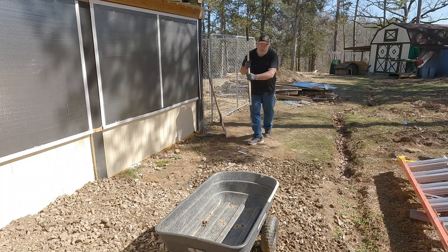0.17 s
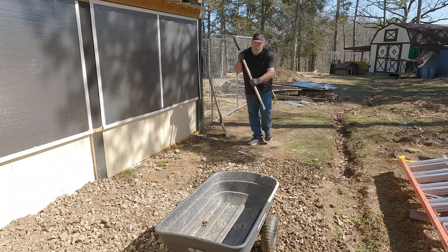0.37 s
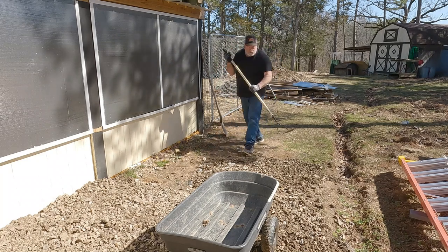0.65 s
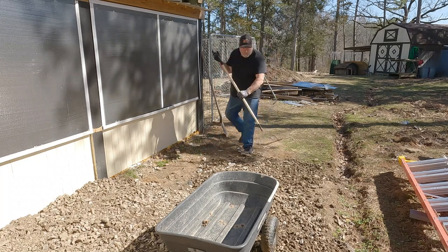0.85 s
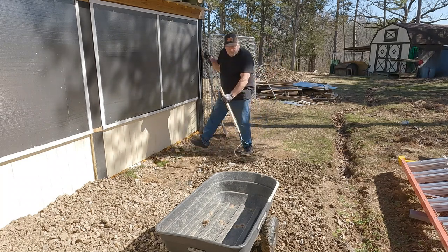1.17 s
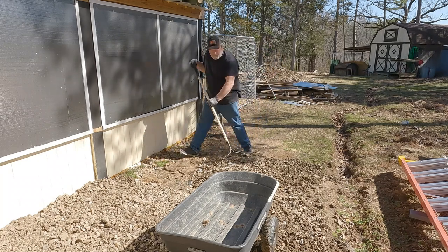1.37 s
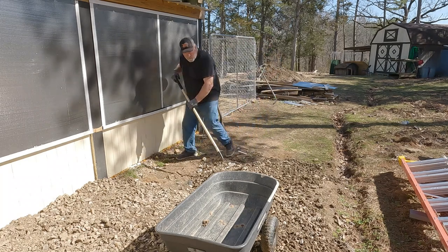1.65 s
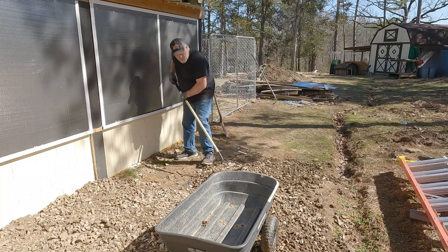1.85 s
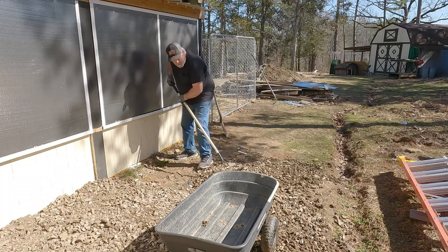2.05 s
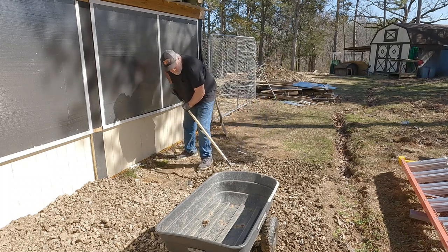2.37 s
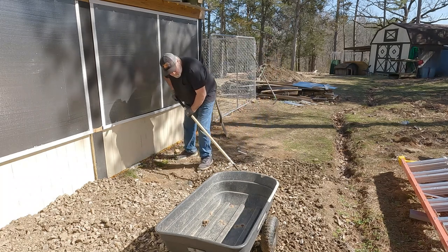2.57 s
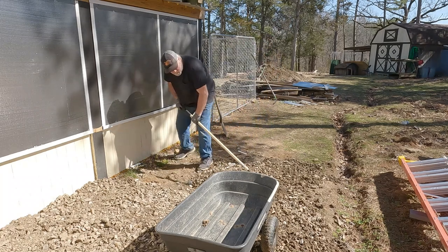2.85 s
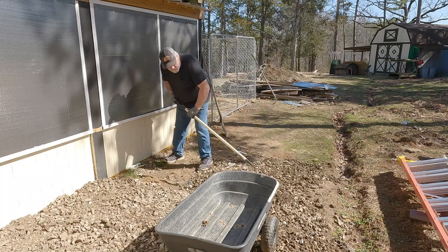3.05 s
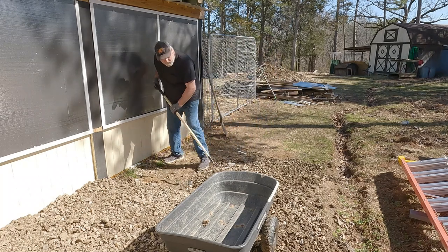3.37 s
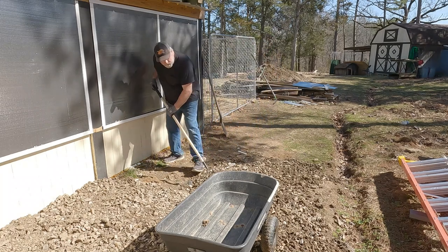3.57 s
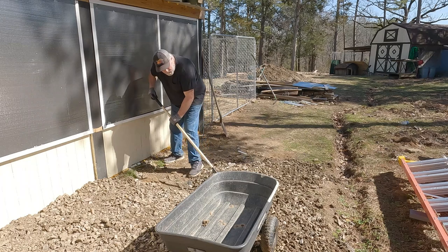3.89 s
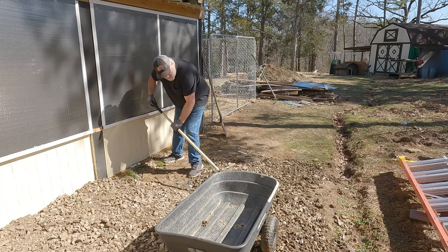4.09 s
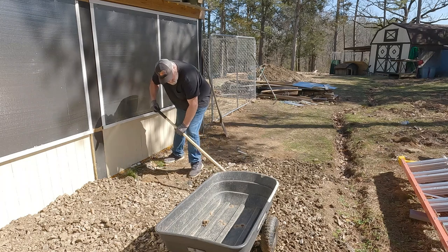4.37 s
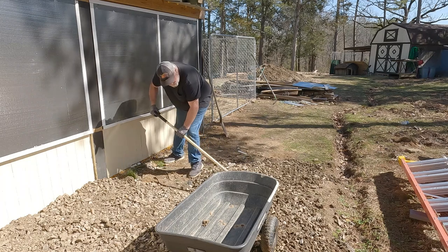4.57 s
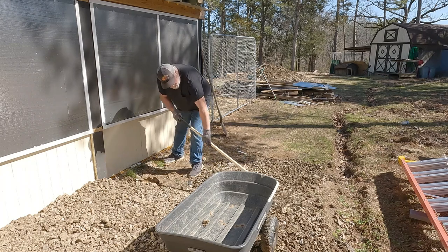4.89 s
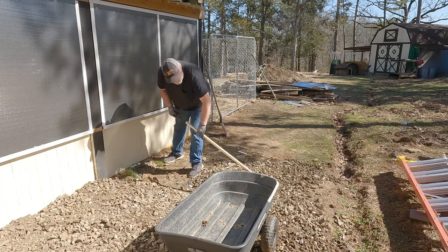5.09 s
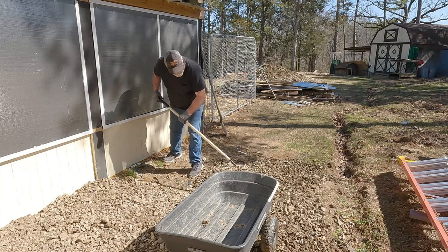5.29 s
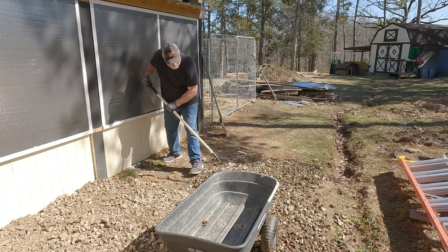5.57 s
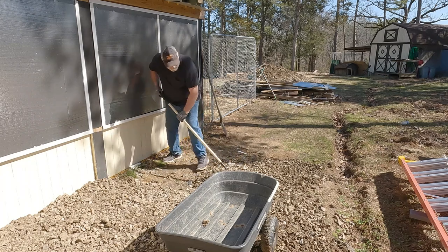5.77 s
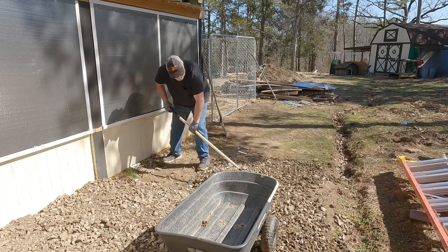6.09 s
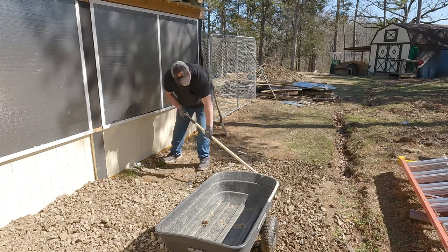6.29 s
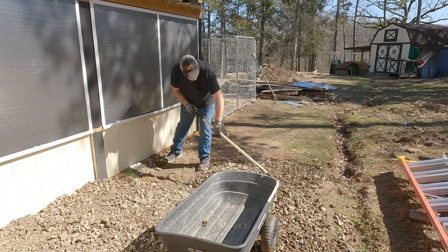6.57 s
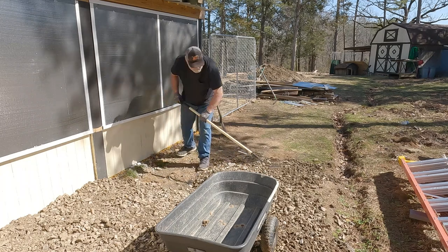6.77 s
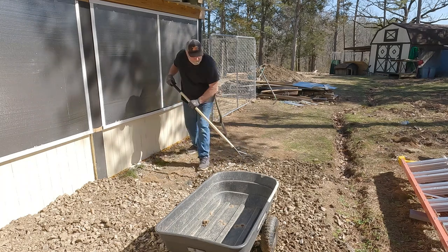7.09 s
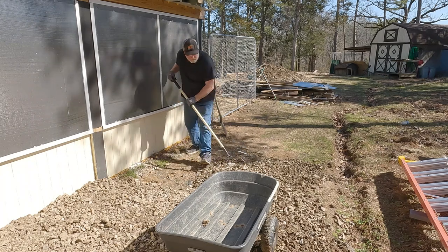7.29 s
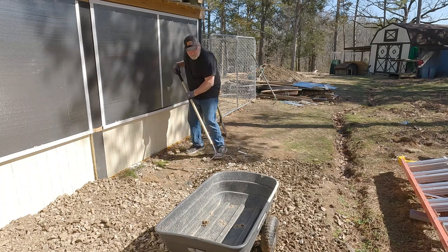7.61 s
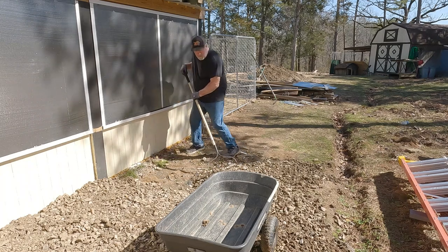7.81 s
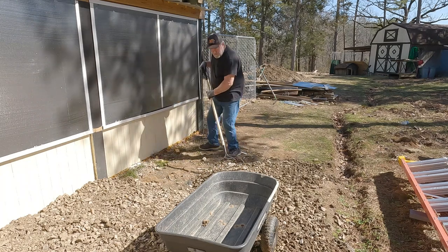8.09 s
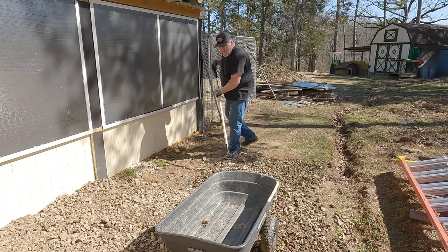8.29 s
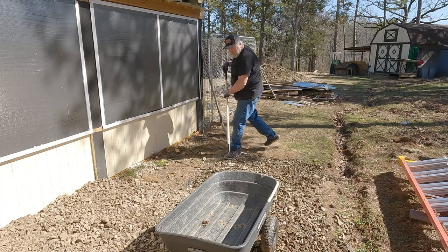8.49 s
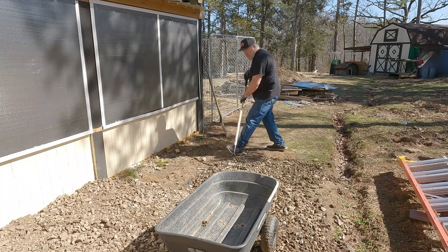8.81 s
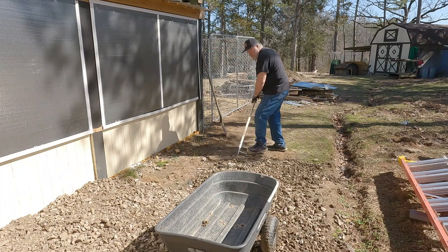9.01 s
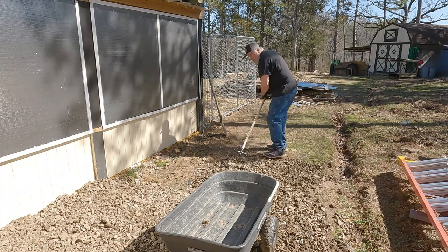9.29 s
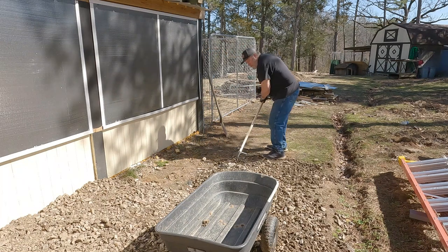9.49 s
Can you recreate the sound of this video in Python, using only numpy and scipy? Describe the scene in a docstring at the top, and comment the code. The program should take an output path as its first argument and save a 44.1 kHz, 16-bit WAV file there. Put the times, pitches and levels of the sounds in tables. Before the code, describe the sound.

A steel rake scrapes and clanks through loose crushed rock in uneven strokes outdoors, with gusty wind rumbling on the microphone.

```python
"""Wind rumbles on the microphone over a faint far hiss: turbulent pressure that drives it into clipping.
A steel rake lands in crushed rock and drags in uneven strokes. Friction is heard as many small impacts;
the harder ones excite the modes of the tines, damped among the stones and ringing when lifted clear.
Boots shuffle between strokes, a small bird cheeps twice, and a faint steady tone sounds near the end."""
import sys
import numpy as np
from scipy.fft import rfft, irfft, next_fast_len
from scipy.io import wavfile
from scipy.ndimage import map_coordinates

SR = 44100
rng = np.random.default_rng(int(sys.argv[2]) if len(sys.argv) > 2 else 0)


def bounce(signal):
    """Save signal as a 16-bit WAV file at the path given by the first command-line argument."""
    frames = np.transpose(np.atleast_2d(signal))
    limited = np.clip(frames, -1, 1)
    pcm = np.round(limited * 32767).astype(np.int16)
    wavfile.write(sys.argv[1], SR, pcm)


N = 425565

# Spectrum of crushed rock in contact: frequency_hz, level_db
ROCK_SPECTRUM = [(470, -41), (800, -12.5), (1470, -7.5), (1570, -8), (1770, -8), (2010, -5), (2490, -5),
                 (2910, -2), (6890, -14.5), (8300, -19.5)]
# Normal modes of the rake head: pitch_hz, level_db, t60_s
TINE_MODES = [(1185, -6.5, 0.053), (1378, -7, 0.075), (1560, -16, .12), (1885, -10, 4.9), (2013, -13, 0.17),
              (2105, -12, 0.14), (2333, -13, 0.42), (2396, -8.5, 0.7), (2750, -18.5, 0.14),
              (3010, -15, 0.11), (3300, -7.5, 0.26), (3530, -7, 0.12), (3690, -11.5, 1), (3850, -9.5, 0.2),
              (4000, -12.5, .25), (4115, -5, .25), (4301, -13, 0.42), (4390, -11.5, 1.1), (4850, -7, 0.041),
              (5360, -1, .28), (5610, -7, 0.12), (6123, -7, .3), (6685, -6.5, 0.11), (7020, -2, 0.093),
              (7480, -4, 0.1), (7865, -2.5, 0.14), (8293, -11, 0.11), (8800, -7, .3), (9300, -3, 0.18)]


def amp(db):
    """Amplitude ratio of a level in decibels."""
    return 10 ** (np.asarray(db) / 20)


def unit(x):
    """Normalisation to rms 1."""
    return x / np.sqrt(np.mean(x ** 2) + 1e-20)


def envelope(rows):
    """Linear interpolation of (time_s, level_db) rows to one level per sample."""
    return np.interp(np.arange(N) / SR, *np.transpose(rows))


def wobble(rate_hz):
    """Slow random modulation: a spline through Gaussian knots."""
    knots = rng.standard_normal(int(N * rate_hz / SR) + 4)
    return map_coordinates(knots, [np.arange(N) * rate_hz / SR])


def swells(rows, rise_s, fall_s):
    """Summed envelopes of (start_s, length_s, level_db) rows: Gaussian rise, hold, exponential decay."""
    out, t = np.zeros(N), np.arange(N) / SR
    for s, length, db in rows:
        part = slice(max(round((s - 4 * rise_s) * SR), 0), round((s + length + 8 * fall_s) * SR))
        before, after = np.maximum(s - t[part], 0), np.maximum(t[part] - s - length, 0)
        out[part] += amp(db) * np.exp(-(before / rise_s) ** 2 - after / fall_s)
    return out


def along(points, hz):
    """Gains interpolated from (frequency_hz, level_db) points on a logarithmic axis."""
    f, db = np.transpose(points)
    return amp(np.interp(np.log(hz + 1), np.log(f + 1), db))


def filtered(x, response):
    """Linear filtering: the spectrum of x times a frequency response."""
    m = next_fast_len(N + SR // 2)
    return irfft(rfft(x, m) * response(np.fft.rfftfreq(m, 1 / SR)), m)[..., :N]


def noise(spectrum):
    """White noise filtered to a spectrum, at rms 1."""
    return unit(filtered(rng.standard_normal(N), lambda hz: along(spectrum, hz)))


def resonance(hz, centre_hz, width_hz):
    """Band-pass response of a damped oscillator."""
    return 1j * hz * width_hz / (centre_hz ** 2 - hz ** 2 + 1j * hz * width_hz)


def steel(hz, scatter_db, longest_s):
    """Modal superposition in the tines; contact damping limits each t60 to longest_s."""
    f, db, t60 = np.transpose(TINE_MODES)[..., None]
    width_hz = np.log(1000) / np.pi / np.minimum(t60, longest_s)
    return np.sum(amp(db + scatter_db) * resonance(hz, f, width_hz), axis=0)


def wind():
    """Turbulence at the microphone port: three noise bands follow the gusts, modulated by eddies."""
    # Strength of the rumble: time_s, level_db
    gusts = [(0.0, -19), (0.8, -16.5), (0.86, -42.5), (0.94, -25.5), (1.72, -11), (2.01, -13), (2.1, -17.5),
             (2.93, -8), (2.96, -19), (3.03, -9.5), (3.44, -14.5), (3.49, -32.5), (3.84, -18),
             (4.16, -30.5), (4.57, -10.5), (4.62, -14), (5.51, -23.5), (5.75, -8.5), (6.13, -19),
             (6.4, -10.5), (6.72, -13), (6.77, -8.5), (7.0, -12.5), (7.17, -10), (7.52, -10), (8.09, -17.5),
             (8.28, -10.5), (8.38, -22.5), (8.46, -14.5), (8.57, -25), (8.65, -14.5), (9.11, -23),
             (9.24, -24.5), (9.38, -22.5), (9.57, -15), (9.65, -17)]
    # Pressure spectra of the three bands, low to high: frequency_hz, level_db
    rumble_spectrum = [(8.8, -5), (15, -6.5), (36, -1.5), (130, -15.5), (170, -31.5), (290, -120)]
    flutter_spectrum = [(50, 8), (90, 10), (170, 12), (250, 0), (400, -50.5), (900, -120)]
    rasp_spectrum = [(150, 0.5), (260, 1), (450, -7.5), (700, -21), (1200, -34.5), (2200, -53),
                     (5000, -120)]
    # Gusts breaking on the port: start_s, length_s, flutter_db, rasp_db
    buffets = [(0., 0.34, -41, -37), (0.25, 0.084, -17.5, -36.5), (0.342, 0.49, -41, -38.5),
               (0.77, 0.013, -29, -44), (1.105, 0.073, -25, -37), (1.297, 0.088, -16, -32),
               (1.567, 0.11, -14, -26.5), (1.7, 0.24, -18, -26), (1.89, 0.038, -23, -13.5),
               (1.95, 0.022, -11.5, -16), (2.011, 0.011, -8, -27), (2.146, 0.054, -16.5, -30),
               (2.27, 0.085, -17, -22.5), (2.397, 0.066, -15, -30), (2.587, 0.047, -13.5, -25),
               (2.649, 0.033, -13.5, -14.5), (2.81, 0.15, -26.5, -28.5), (3.047, 0.18, -29.5, -34),
               (3.246, 0.081, -14.5, -30), (3.402, 0.026, -24.5, -34), (3.555, 0.02, -24.5, -42),
               (3.787, 0.03, -51, -50), (3.95, 0.082, -36, -35), (4.33, 0.041, -28, -29),
               (4.49, 0.17, -17, -33), (4.544, 0.029, -13.5, -12.5), (4.7, 0.01, -26, -20),
               (5.695, 0.05, -15.5, -31.5), (6.218, 0.044, -15, -22), (6.354, 0.008, -10.5, -21),
               (6.423, 0.016, -16.5, -20), (6.46, 0.008, -16, -22), (6.5, 0.024, -18, -24),
               (6.561, 0.093, -15, -24.5), (6.719, 0.015, -18, -15.5), (6.77, 0.022, -13, -13.5),
               (6.831, 0.017, -9.5, -17), (6.909, 0.016, -13, -17), (6.943, 0.041, -8, -13.5),
               (7.031, 0.016, -14.5, -21.5), (7.09, 0.013, -19, -23.5), (7.179, 0.073, -13.5, -28.5),
               (7.498, 0.019, -14.5, -28.5), (7.6, 0.014, -32, -36), (7.85, 0.034, -21.5, -32),
               (8.173, 0.015, -27, -57), (8.305, 0.024, -19, -39), (8.722, 0.014, -15.5, -42.5),
               (9.241, 0.063, -14.5, -39), (9.479, 0.077, -17.5, -41)]
    eddy = wobble(34)
    rumble_db = envelope(gusts)
    mean_db = rumble_db.mean()
    gust_db = rumble_db - mean_db
    flutter = amp(mean_db - 14.5 + 0.91 * gust_db + 2.2 * wobble(9.9))
    rasp = amp(mean_db - 20.5 + 0.59 * gust_db + 3 * wobble(7))
    rumble = amp(rumble_db + 1.93 * wobble(8))
    for gain, column in ((flutter, 2), (rasp, 3)):
        gain += swells(np.array(buffets)[:, [0, 1, column]], rise_s=0.006, fall_s=0.035)
    out = np.zeros(N)
    for gain, spectrum, shared_db, own_db, rate_hz in ((rumble, rumble_spectrum, 1, 1.5, 12),
                                                       (flutter, flutter_spectrum, 3, 2.5, 50),
                                                       (rasp, rasp_spectrum, 3.5, 3.5, 80)):
        lumps = amp(shared_db * eddy + own_db * wobble(rate_hz))
        out += gain * unit(lumps * noise(spectrum))
    return out


def far_hiss():
    """Incoherent sources add to a nearly steady broadband noise."""
    # Far trees and air: frequency_hz, level_db
    air_spectrum = [(180, -52), (300, 1), (509, -6), (937, -23), (1220, -20), (2130, -31.5), (3180, -34.5),
                    (8300, -39)]
    return amp(-41.5 + 1.1 * wobble(1.66)) * noise(air_spectrum)


def stir(tilt):
    """Amplitude envelope of the moving stones in the bass (tilt near -1), middle (0) or treble (near 1)."""
    # The rake pulled through the stones, one list a stroke: time_s, level_db, treble_over_bass_db
    strokes = [
        [(2.2, -57, 4), (2.31, -32, -13), (2.42, -34.5, -7), (2.55, -36, -7), (2.69, -31.5, -8),
         (2.95, -25.5, -2), (3.03, -26, -1), (3.2, -40, 20), (3.28, -32.5, -2), (3.36, -51.5, 20),
         (3.64, -57, -12)],
        [(3.7, -49, -6), (3.8, -38, -5), (3.92, -31, -9), (3.98, -29, -8.5), (4.3, -30, -8.5),
         (4.49, -34.5, -7), (4.57, -39.5, 4), (4.67, -45.5, 0)],
        [(4.66, -48, 5), (4.76, -34, -9), (4.89, -20.5, 1), (4.93, -22.5, 8), (4.97, -18, 10),
         (5.02, -19.5, -6), (5.08, -23, 20), (5.11, -28.5, 11), (5.16, -26, 19), (5.21, -30.5, 5),
         (5.29, -35, 1), (5.4, -45.5, 20), (5.51, -43, 4), (5.6, -57.5, 9), (5.83, -57, 13)],
        [(5.86, -57, 1), (5.9, -35, -19), (6.03, -25, -6.5), (6.13, -30.5, -9), (6.29, -34.5, -3),
         (6.4, -29.5, -5), (6.46, -25, -13), (6.49, -29.5, -1), (6.53, -30, 2), (6.59, -24, -1),
         (6.65, -27.5, -10), (6.72, -39, -9), (6.88, -43, -2), (7., -54, -5)],
    ]
    # Stones kicked by a boot or the landing head: start_s, length_s, level_db, treble_over_bass_db
    scuffs = [(0.077, 0.027, -62.5, 0), (.28, 0.036, -59, 1), (0.626, .09, -51.5, 18),
              (0.467, 0.041, -64, 22), (0.788, 0.06, -53.5, 18), (0.873, 0.1, -52, -6),
              (1.302, 0.022, -48, 7), (1.536, 0.15, -50.5, 13), (1.651, 0.039, -26, -11),
              (1.7, 0.018, -43.5, 0), (1.16, 0.034, -59.5, -19), (1.45, 0.0172, -62, 14.5),
              (1.746, 0.29, -50, -2), (2.114, 0.056, -38, 16), (3.658, 0.035, -32, 1),
              (5.74, 0.039, -62, 13), (5.855, 0.005, -24.5, 16), (7.003, 0.016, -42.5, 13),
              (7.05, 0.1, -57, 8), (7.18, 0.056, -46.5, 7), (7.294, 0.12, -49.5, 7),
              (7.513, 0.062, -55, -8), (7.602, 0.032, -47.5, 13), (7.673, 0.036, -46, -1),
              (7.737, .03, -51, 6), (7.8, 0.18, -50.5, 20), (7.978, 0.071, -42.5, -2), (8.15, 0.11, -55, 0),
              (8.585, 0.013, -68, 6.5), (8.83, 0.066, -62, 20), (8.97, .02, -56, 18),
              (9.017, 0.079, -46.5, -12), (9.64, .05, -40.5, -23.5)]
    t = np.arange(N) / SR
    gain = amp(-65.5)  # stones always settle a little
    for stroke in strokes:
        s, level_db, bright_db = np.transpose(stroke)
        gain = gain + amp(np.interp(t, s, level_db + tilt * bright_db / 2, left=-150, right=-150))
    kicks = [(s, length, db + tilt * bright_db / 2) for s, length, db, bright_db in scuffs]
    return gain + swells(kicks, rise_s=0.013, fall_s=0.026)


def stone_clicks(count, cycles, spread_db, centre_hz):
    """Shot noise: collisions at random times, each a damped sine, a few of them large."""
    start, pitch, size = rng.random(count) * N, rng.standard_normal(count), rng.exponential(size=count)
    hz = np.clip(centre_hz * np.exp(.55 * pitch), 500, 14000)[:, None]
    k = np.arange(256)
    decay = np.exp(-k * hz / (cycles * SR))
    clicks = amp(spread_db * size)[:, None] * np.sin(2 * np.pi * hz * k / SR) * decay
    positions = start.astype(int)[:, None] + k
    return unit(np.bincount(positions.ravel(), clicks.ravel(), N + 256)[:N])


def sliding_stones():
    """Granular friction: clumps of hiss and clicks force the buried tines to vibrate."""
    clumps = amp(wobble(70) + 1.6 * wobble(20) + wobble(10))
    clicks = stone_clicks(count=18000, cycles=5, spread_db=1.9, centre_hz=3480)
    clicks = filtered(clicks, lambda hz: 1 / (1 + (hz / 7500) ** 6))
    grit = unit(clumps * (noise(ROCK_SPECTRUM) + 0.63 * clicks))
    bass = filtered(grit, lambda hz: 1 / (1 + (hz / 3000) ** 2))
    gravel = stir(tilt=-1.07) * bass + stir(tilt=0.74) * (grit - bass)
    tines = filtered(gravel, lambda hz: steel(hz, scatter_db=0, longest_s=0.08))
    return gravel + amp(-4.5) * tines


def soil():
    """Friction in soft earth: dull, lumpy noise as it shifts and is thrown with the stones."""
    # Shifting of the soil: time_s, level_db
    shifts = [(0.0, -44), (0.46, -45), (1.15, -56), (1.72, -40), (2.93, -39), (3.44, -46.5), (3.71, -52),
              (4.03, -43.5), (5.0, -42.5), (5.29, -82), (5.78, -56), (6.04, -44), (6.34, -61),
              (6.56, -47.5), (7.28, -42), (7.55, -40.5), (7.62, -36), (7.8, -34), (7.9, -41.5), (8.0, -37),
              (8.2, -42.5), (8.38, -46), (8.71, -53), (9.2, -45.5), (9.55, -49), (9.65, -41)]
    # Earth under boots and tines: frequency_hz, level_db
    soil_spectrum = [(350, -33.5), (600, 4.5), (1000, 0.5), (1600, -6), (2500, -14), (5000, -100)]
    clods = unit(amp(1.5 * wobble(50) + 2.46 * wobble(10)) * noise(soil_spectrum))
    return (amp(envelope(shifts)) + amp(-24) * stir(tilt=0)) * clods


def stray_pebbles():
    """Sparse shot noise: bright, heavily damped clicks wherever stones move."""
    return amp(-16.5) * stir(tilt=0.98) * stone_clicks(count=900, cycles=.8, spread_db=1.5, centre_hz=5000)


def impacts(rows, crunch_t60_s):
    """Source and filter: a crack and a crunch, coloured by rock and, given a ring level, by the tines."""
    size, lead = 6144, 256
    out, t, hz = np.zeros(N + SR), np.arange(size - lead) / SR, np.fft.rfftfreq(size, 1 / SR)
    stone = along(ROCK_SPECTRUM, hz)
    for s, db, colour_hz, *ring_db in rows:
        cutoff_hz = 5600 * amp(0.12 * db)  # softer blows are duller
        rock = stone / np.sqrt(1 + (hz / cutoff_hz) ** 2)
        hiss, contacts, modes = rng.standard_normal((3, len(t)))
        lumps = amp(1.8 * np.interp(t * 250, np.arange(len(t)), contacts))  # several contacts in one blow
        crunch = lumps * amp(-60 * t / crunch_t60_s) * (1 - np.exp(-t / 0.0017))
        crack = 0.49 * amp(-60 * t / 0.017)
        burst = np.pad(hiss * (crack + crunch), (lead, 0))
        colour = rock * (0.24 + abs(resonance(hz, colour_hz, 0.18 * colour_hz)))
        if ring_db:
            drive = colour + 0.089 * rock  # a share reaches modes far from the blow's colour
            tines = steel(hz, scatter_db=2 * modes[:len(TINE_MODES), None], longest_s=0.085)
            colour = colour + drive * amp(ring_db[0]) * tines
        blow = irfft(rfft(burst) * colour, size)
        out[round(s * SR):][:size] += amp(db) * blow / np.abs(blow).max()
    return out[lead:][:N]


def stone_knocks():
    """Heavily damped impact: a noise burst with one broad resonance."""
    # Stone strikes stone: start_s, peak_db, colour_hz
    knocks = [(.0807, -42, 1520), (.743, -25, 3220), (1.2875, -43, 2060), (1.499, -35, 2130),
              (2.1574, -22, 3770), (2.3783, -33, 2400), (2.6958, -19, 1910), (2.7125, -14.5, 3220),
              (2.7432, -26, 3080), (2.81, -20, 3470), (3.1733, -26, 4900), (3.241, -32, 2430),
              (3.472, -35, 1500), (3.709, -20, 3400), (3.763, -27, 3300), (3.7828, -24, 3510),
              (3.8038, -20.5, 3170), (4.5765, -28, 1900), (4.8499, -15, 2820), (5.1477, -5.5, 2770),
              (5.3326, -24, 3900), (5.343, -15.5, 3900), (5.3785, -29, 2260), (5.484, -22.5, 4200),
              (5.5103, -23, 3880), (5.5927, -31.5, 1850), (5.6775, -28, 1530), (6.2467, -21, 3320),
              (6.8272, -25, 2130), (6.996, -27, 3050), (7.0154, -28, 1880), (7.0684, -30.5, 1900),
              (7.199, -30, 1900), (7.6123, -27.5, 1490), (7.65, -23.5, 1850), (7.665, -24, 1800),
              (7.742, -29, 750), (7.777, -34, 750), (7.79, -35, 750), (7.8163, -32, 1540),
              (7.981, -25, 4070), (8.02, -30, 2400), (8.06, -34, 1400), (8.1727, -34, 2800),
              (8.972, -39, 1610)]
    return impacts(knocks, crunch_t60_s=0.045)


def pebble_snaps():
    """Impulse excitation: one push and a little grit, through a resonance too wide to ring."""
    # Single pebbles snapping together: start_s, peak_db
    snaps = [(0.0817, -34), (0.743, -21.5), (0.7986, -44), (0.9204, -44), (1.498, -44), (1.6417, -28.5),
             (1.6546, -17), (2.1016, -27), (2.1176, -13), (2.1585, -23), (2.405, -21), (2.6958, -18),
             (2.7881, -28), (2.8553, -18), (2.8824, -26), (2.97, -16), (3.0315, -13), (3.081, -14.5),
             (3.128, -14), (3.1594, -34), (3.174, -13), (3.2405, -25), (3.249, -21), (3.269, -21),
             (3.472, -31), (3.654, -5), (3.673, -16), (3.8197, -26), (3.9689, -31), (4.1844, -24),
             (4.2535, -28), (4.8686, -12), (4.964, -2), (5.056, -9), (5.086, -15), (5.1033, -20),
             (5.13, -9), (5.1402, -9), (5.155, -16), (5.162, -22), (5.172, -9), (5.183, -11), (5.211, -11),
             (5.229, -31), (5.247, -24), (5.259, -20), (5.276, -31), (5.2904, -31), (5.333, -5.5),
             (5.378, -21), (5.4839, -17.5), (5.7638, -31), (5.8421, -29), (5.8481, -14), (5.947, -10),
             (6.0526, -19), (6.1554, -29), (6.423, -20), (6.4996, -12), (6.555, -24), (6.5864, -3),
             (6.671, -12), (6.745, -35), (6.755, -26), (6.775, -26), (6.784, -19), (6.829, -23),
             (6.8447, -17), (6.996, -31), (7.01, -15.5), (7.016, -25), (7.1, -31), (7.2659, -44),
             (7.3148, -27), (7.364, -32), (7.3844, -49), (7.9623, -26), (7.9814, -37), (8.173, -30),
             (8.857, -36), (8.97, -39)]
    out, t, hz = np.zeros(N + SR), np.arange(256) / SR, np.fft.rfftfreq(512, 1 / SR)
    pebble = resonance(hz, centre_hz=3700, width_hz=5000) ** 2 / np.sqrt(1 + (hz / 7000) ** 6)
    for s, db in snaps:
        push = (t == 0) + 0.3 * rng.standard_normal(len(t)) * amp(-60 * t / 0.008)
        snap = irfft(rfft(push, 512) * pebble)
        out[round(s * SR):][:len(snap)] += amp(db) * snap / np.abs(snap).max()
    return out[:N]


def thin_whistles():
    """Amplitude modulation: whistles of steady pitch swell and fade with a 30 Hz tremolo."""
    # Two short bird cheeps and one faint, long steady tone: start_s, length_s, pitch_hz, level_db
    whistles = [(0.766, 0.098, 3805, -44), (5.735, 0.044, 3630, -42), (7.864, 0.63, 3010, -61)]
    out = np.zeros(N)
    for s, length, hz, db in whistles:
        t = np.arange(round(length * SR)) / SR
        swell = np.sin(np.pi * t / length) ** .5 * (1 + 0.67 * np.cos(2 * np.pi * 30 * t))
        out[round(s * SR):][:len(t)] += amp(db) * swell * np.sin(2 * np.pi * hz * t)
    return out


def tine_clanks():
    """Broadband impact excites all the modes of the rake head at once."""
    # Tines strike stone: start_s, peak_db, colour_hz, ring_db
    clanks = [(1.6408, -10, 3520, 13), (1.65, -0.5, 3530, 12.5), (1.6722, -13, 2460, 9.5),
              (2.1178, -18.5, 4850, 28), (2.4094, -19.5, 3700, 10), (2.427, -17.5, 2200, 10),
              (2.5382, -20, 3530, 8), (2.8614, -19, 2800, 21), (2.9728, -4.5, 2930, 15),
              (3.0065, -10, 3220, -13), (3.6544, -7, 3500, 16), (3.6752, -6.5, 3530, 20),
              (3.818, -13, 3230, 17), (3.906, -12, 3300, 9), (3.971, -11.5, 3300, 12),
              (4.114, -35, 2390, 12), (4.1852, -11, 2800, 3), (4.2484, -16, 2290, 31),
              (4.3217, -13.5, 2150, 19), (4.8685, -4, 2970, 16), (4.8903, -5, 2180, 16),
              (4.916, -6.5, 3300, 2), (4.9528, -0.5, 3140, 1), (4.9674, -4.5, 2020, 17),
              (4.9954, -5.5, 3040, 26), (5.029, -7.5, 1980, 22), (5.047, -9, 1900, 3), (5.061, -3, 2900, 8),
              (5.079, -18, 3540, 16), (5.8495, -8, 2140, 20), (5.944, -6.5, 2420, 18),
              (5.9818, -6.5, 1250, -10), (6.0546, -7.5, 2930, 11), (6.0916, -10, 2350, 7),
              (6.366, -21, 2430, 33), (6.4223, -12, 2400, 31), (6.4459, -6, 2960, 5), (6.503, -3, 2820, 14),
              (6.548, -8.5, 2320, 12), (6.562, -8, 2330, 10), (6.5906, -4, 2400, 18),
              (6.6281, -6.5, 3130, 15), (6.653, -12, 3020, 23), (6.672, -11, 3140, 22),
              (9.011, -21, 3300, 18.5), (9.018, -21.5, 1900, 12), (9.045, -34, 1200, 13),
              (9.085, -39, 2013, 16.5), (9.1304, -30, 2350, 16), (9.2229, -41, 1430, 17),
              (9.3985, -39.5, 2400, 18)]
    return impacts(clanks, crunch_t60_s=0.042)


def clank_partials():
    """Damped modal vibration: each strong partial builds over the contact, wavers and decays."""
    # The strongest ringing partials of the tine clanks, several to a blow: start_s, pitch_hz, level_db
    strong_partials = [(1.641, 3530, -18.5), (1.65, 3300, -14), (1.652, 1378, -16.5), (1.653, 3010, -15.5),
                       (1.655, 4115, -20.5), (1.658, 2396, -16), (1.66, 3530, -16.5), (1.675, 1885, -23),
                       (1.69, 3530, -28), (1.75, 1885, -31), (1.66, 6685, -36), (1.682, 7865, -37),
                       (1.72, 1885, -34), (3.04, 3530, -26), (3.075, 3530, -25), (3.6545, 6123, -21),
                       (3.657, 7865, -34), (3.655, 2333, -20.5), (3.657, 4115, -27), (3.675, 3530, -14),
                       (3.676, 1185, -26), (3.68, 1378, -20), (3.682, 2013, -26), (3.676, 5360, -30),
                       (3.695, 5360, -33), (3.735, 5360, -39), (3.8, 5610, -42), (3.82, 5610, -32),
                       (3.908, 5360, -39), (4.869, 3010, -17.5), (4.891, 2105, -17.5), (4.893, 3300, -17.5),
                       (4.953, 3010, -18.5), (4.958, 2105, -20), (4.968, 2105, -15), (4.97, 6123, -26),
                       (5.005, 2013, -15), (5.03, 2013, -18), (5.046, 1885, -17.5), (5.062, 6685, -30),
                       (5.07, 1885, -21), (5.851, 5360, -38), (5.851, 1185, -16), (5.852, 2396, -26),
                       (5.853, 6123, -34), (5.946, 2396, -20), (5.946, 4115, -24), (5.947, 4850, -21),
                       (5.948, 1185, -18), (5.983, 2333, -15), (5.984, 3010, -23), (6.056, 3300, -17),
                       (6.057, 5610, -27), (6.057, 1185, -19), (6.093, 2333, -19), (6.094, 3300, -23),
                       (6.096, 4301, -27), (6.422, 2396, -19), (6.448, 1185, -16), (6.448, 3010, -16),
                       (6.55, 2105, -22), (6.551, 3300, -22), (6.562, 2396, -20.5), (6.592, 2396, -22),
                       (6.593, 3300, -17.5), (6.67, 3690, -27), (6.89, 3690, -40), (6.425, 6685, -32),
                       (6.449, 7480, -25), (6.451, 6123, -32), (6.506, 7480, -27), (6.504, 5610, -25),
                       (6.562, 7480, -31), (6.594, 6685, -26), (6.595, 7480, -26), (6.675, 6123, -32),
                       (6.678, 7480, -37), (6.68, 6685, -42), (6.684, 8800, -40), (9.011, 3300, -30),
                       (9.012, 3530, -35), (9.018, 1885, -34), (9.04, 3530, -35), (9.085, 2013, -40),
                       (9.012, 1185, -27), (9.045, 1185, -38), (9.013, 5360, -53), (9.013, 6685, -42),
                       (9.028, 3530, -32), (9.055, 3300, -38), (9.07, 7865, -57), (9.131, 2396, -33),
                       (9.131, 7865, -57), (9.133, 3010, -37), (9.133, 1378, -33), (9.135, 4115, -53),
                       (9.14, 5610, -55), (9.226, 1378, -47)]
    out, t = np.zeros(N + SR), np.arange(SR // 5) / SR
    modes_hz, _, t60 = np.transpose(TINE_MODES)
    damped_t60 = np.minimum(t60, 0.105)
    for s, hz, db in strong_partials:
        k = np.argmin(abs(modes_hz - hz))
        waver = amp(4 * np.interp(t * 150, np.arange(32), rng.standard_normal(32)))
        ring = amp(db - 60 * t / damped_t60[k]) * (1 - np.exp(-t / 0.0027)) * waver
        out[round(s * SR):][:len(t)] += ring * np.sin(2 * np.pi * modes_hz[k] * t)
    return out[:N]


def eddy_pops():
    """A pressure transient swings the diaphragm for a cycle or two, falling in pitch."""
    # Sharp eddies, each a low pop of rough pitch: start_s, peak_db, pitch_hz
    eddies = [(1.889, -10, 413), (1.907, -14, 350), (1.955, -3, 260), (2.012, -5, 296), (2.035, -16, 202),
              (2.324, -29, 149), (2.635, -15, 185), (2.661, -32, 146), (2.678, -6.5, 147),
              (4.543, -19, 155), (4.553, -4.5, 260), (4.564, -4.5, 380), (4.5751, 2.5, 427),
              (4.58, -1, 200), (4.589, -6, 203), (4.72, -33, 155), (6.356, -5.5, 252), (6.385, -12, 170),
              (6.415, -8.5, 170), (6.432, -14, 390), (6.462, -13, 410), (6.501, -18, 273),
              (6.714, -25.5, 150), (6.722, -6.5, 265), (6.78, -1.5, 147), (6.832, -11, 216),
              (6.84, -7, 410), (6.855, -6, 250), (6.885, -7, 158), (6.902, -8, 230), (6.943, -8, 422),
              (6.948, -5, 187), (6.965, -6, 220), (6.981, 1.5, 190), (7.039, -2.5, 170),
              (7.105, -10.5, 218), (7.742, -28, 149)]
    out, t = np.zeros(N + SR), np.arange(SR // 20) / SR
    for s, db, hz in eddies:
        age = 3 * hz * t  # in decay time constants
        swing = np.sin(2 * np.pi * hz * t * (1.3 - 6 * t)) * age ** 2 * np.exp(-age)
        out[round(s * SR):][:len(t)] += amp(db) * swing / np.abs(swing).max()
    return out[:N]


def lifted_head():
    """Free vibration: the long-lived modes sing on, beating as nearly tuned tines do."""
    # The head swings clear of the stones: start_s, level_db
    lifts = [(5.189, -40.5), (6.689, -31.5)]
    out, t = np.zeros(N + SR), np.arange(SR) / SR
    airborne_s, beat_hz = 0.65, 5.6
    fade = np.clip(np.minimum(t / 0.012, (airborne_s - t) / 0.031), 0, 1)
    beat = 1 + .4 * np.cos(2 * np.pi * beat_hz * (t - .03))
    lasting_modes = [(hz, db, t60) for hz, db, t60 in TINE_MODES if t60 > .35]
    for s, db in lifts:
        for hz, mode_db, t60 in lasting_modes:
            waver = amp(3 * wobble(40)[:SR])
            ring = amp(db + mode_db - 60 * t / t60) * waver * beat * fade
            out[round(s * SR):][:SR] += ring * np.sin(2 * np.pi * hz * t)
    return out[:N]


def scene():
    """Superposition of all sources at one microphone."""
    raking = sliding_stones() + soil() + tine_clanks() + stone_knocks() + pebble_snaps() + stray_pebbles()
    ringing = lifted_head() + clank_partials()
    return (raking + ringing + wind() + eddy_pops() + far_hiss() + thin_whistles())[None]


def record(dry):
    """Transduction: the capsule's response, soft saturation at full scale, then a band limit."""
    # The capsule loses the treble: frequency_hz, gain_db
    capsule_response = [(7000, -2), (8300, -3), (9300, -11), (12500, -13.5), (15600, -43.5)]
    heard = filtered(dry, lambda hz: along(capsule_response, hz))
    clipped = heard / (1 + np.abs(heard) ** 8) ** (1 / 8)
    return filtered(clipped, lambda hz: hz < 15633)


dry = scene()
out = record(dry)
bounce(out)
```